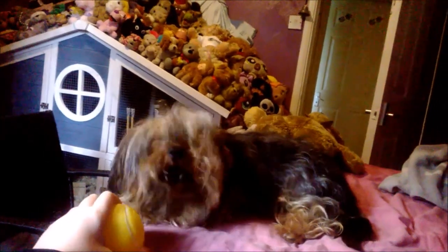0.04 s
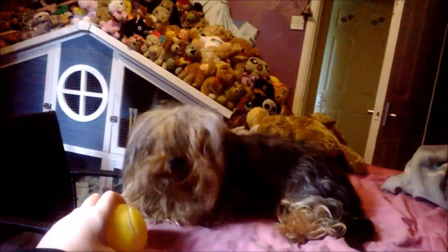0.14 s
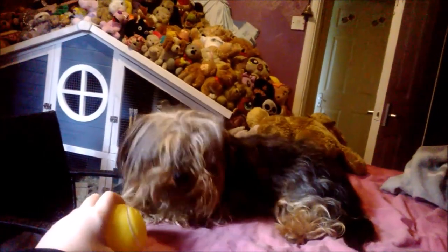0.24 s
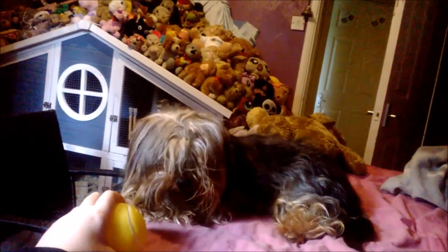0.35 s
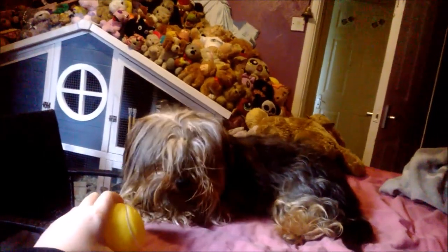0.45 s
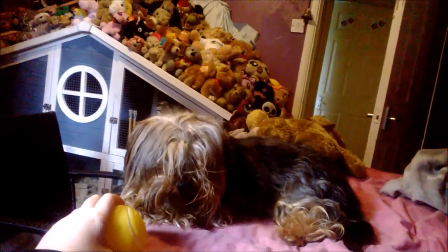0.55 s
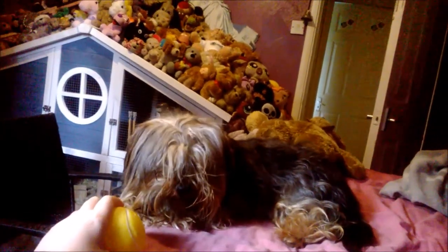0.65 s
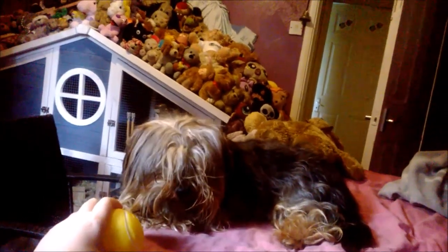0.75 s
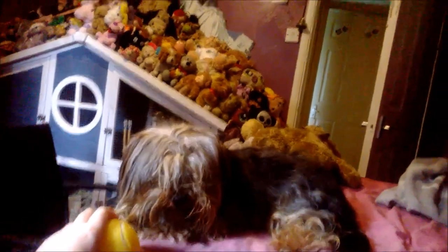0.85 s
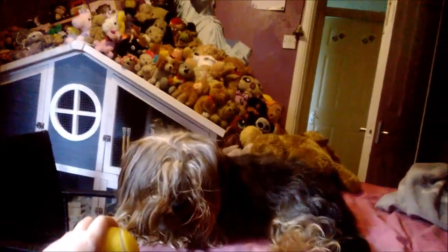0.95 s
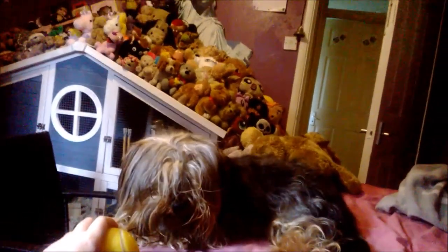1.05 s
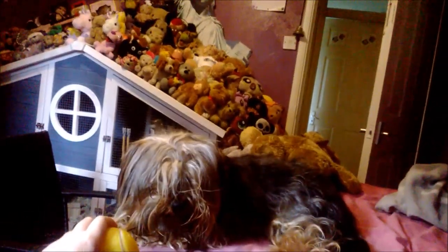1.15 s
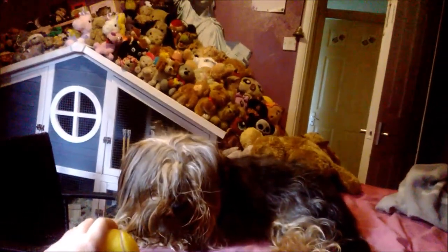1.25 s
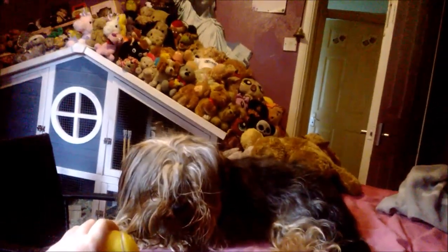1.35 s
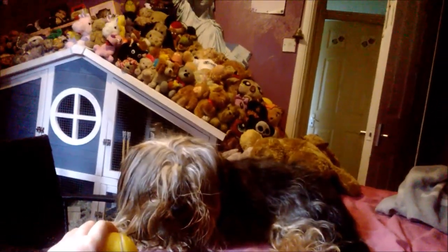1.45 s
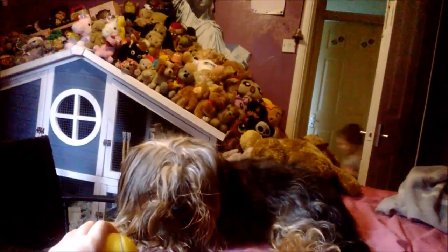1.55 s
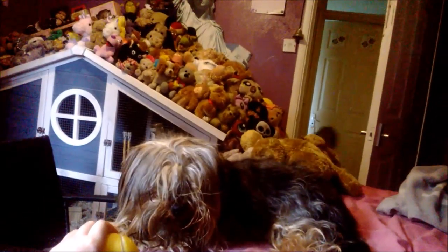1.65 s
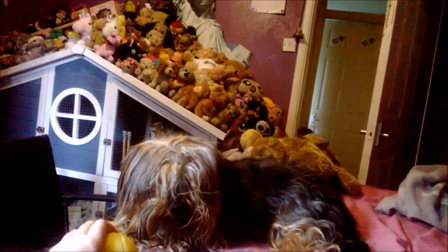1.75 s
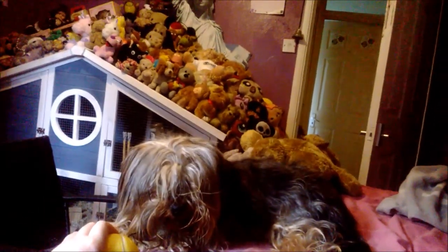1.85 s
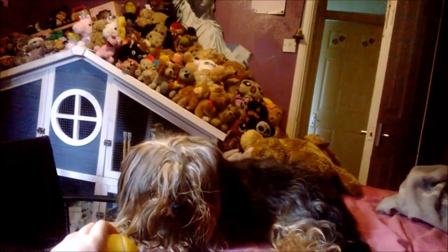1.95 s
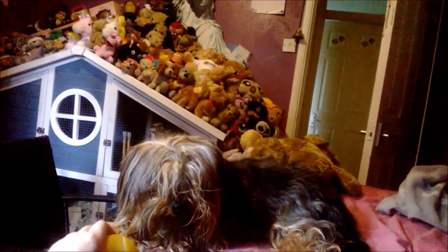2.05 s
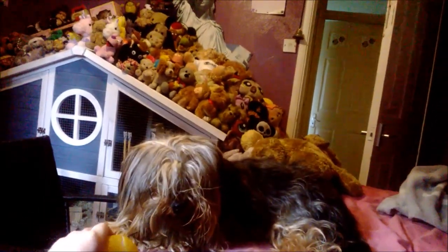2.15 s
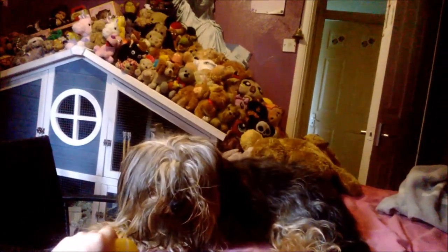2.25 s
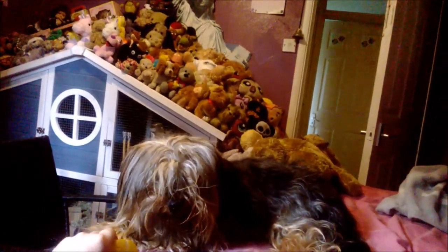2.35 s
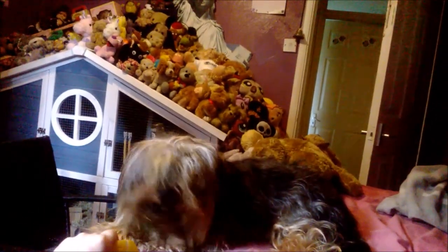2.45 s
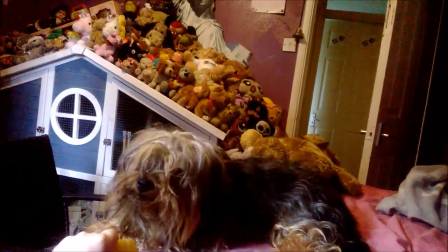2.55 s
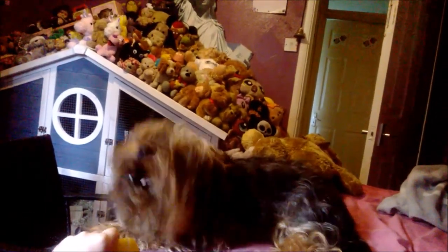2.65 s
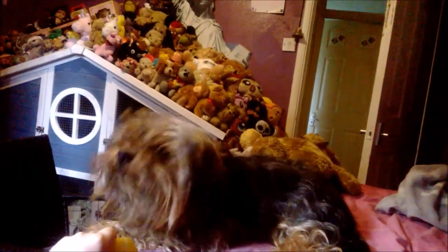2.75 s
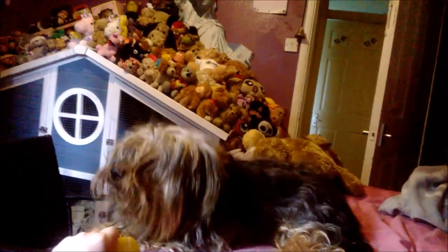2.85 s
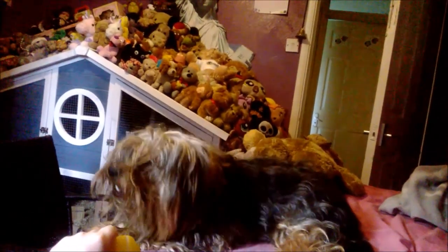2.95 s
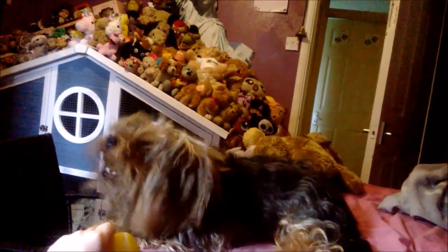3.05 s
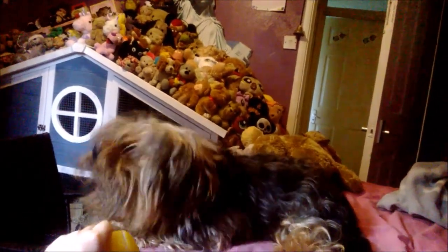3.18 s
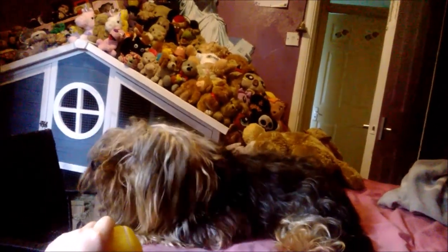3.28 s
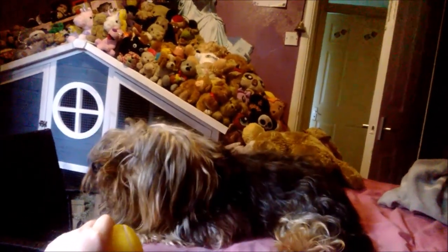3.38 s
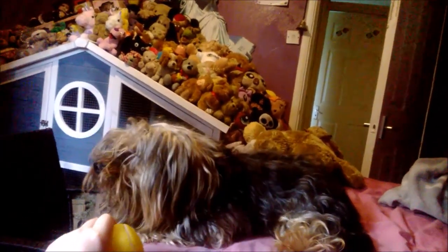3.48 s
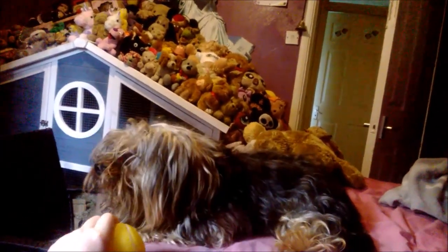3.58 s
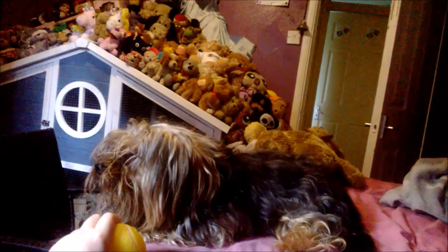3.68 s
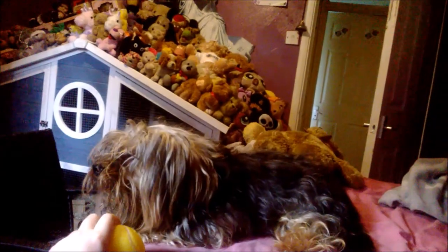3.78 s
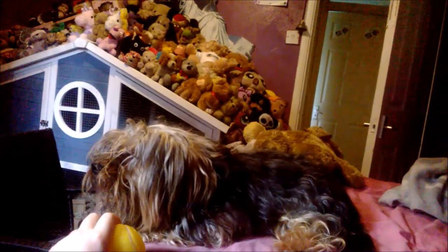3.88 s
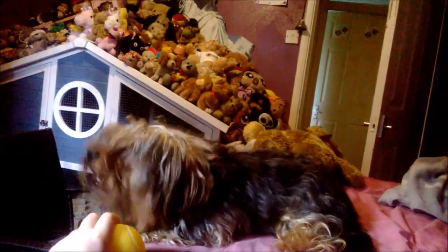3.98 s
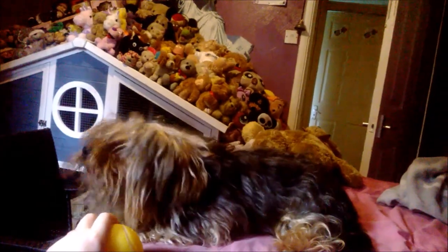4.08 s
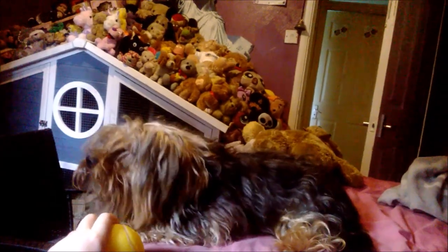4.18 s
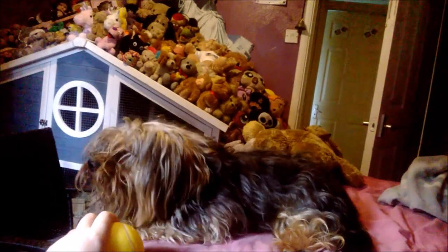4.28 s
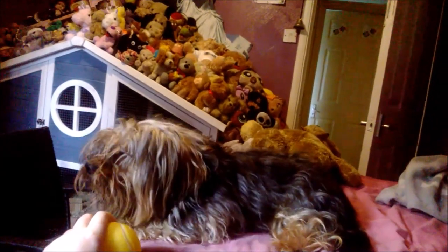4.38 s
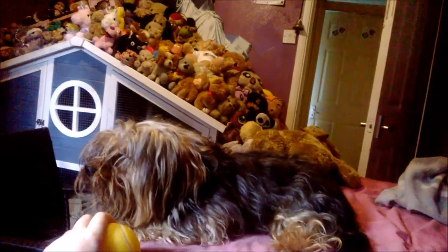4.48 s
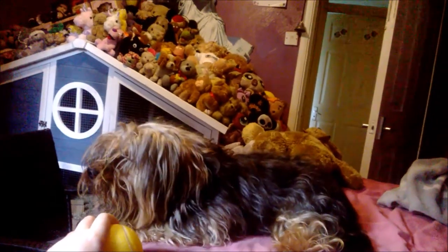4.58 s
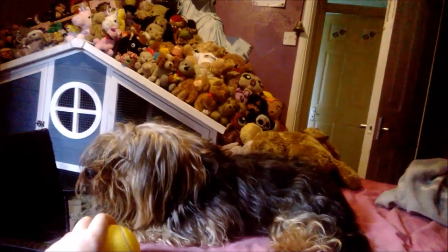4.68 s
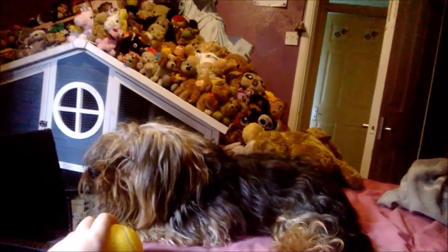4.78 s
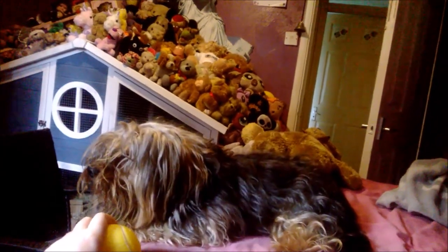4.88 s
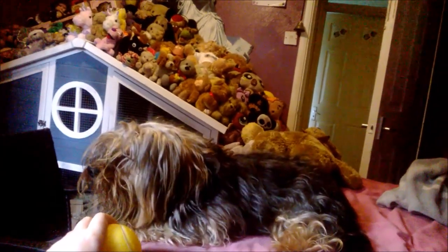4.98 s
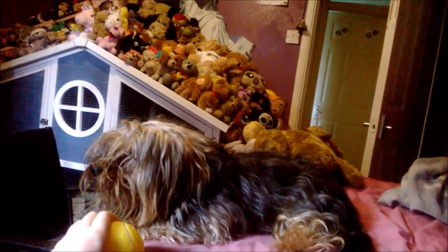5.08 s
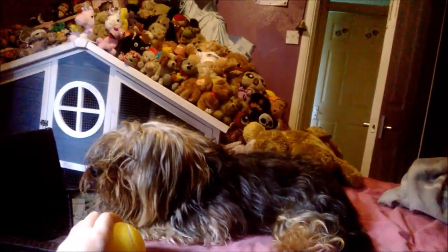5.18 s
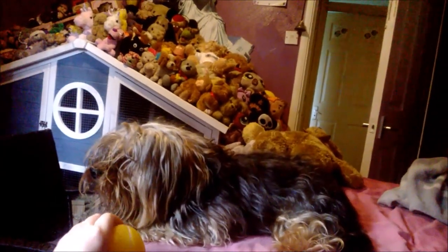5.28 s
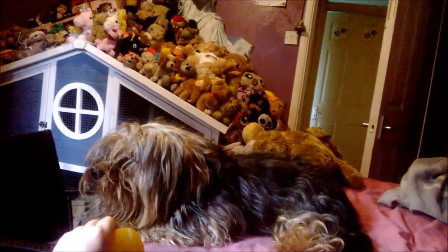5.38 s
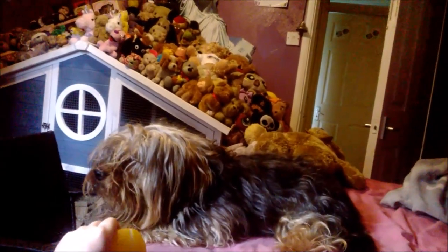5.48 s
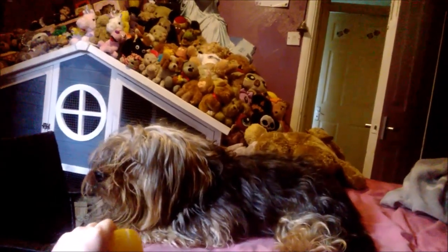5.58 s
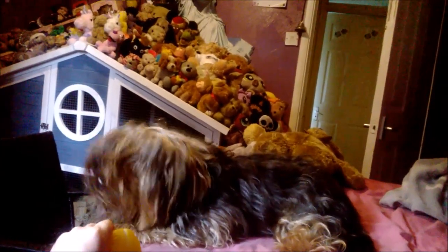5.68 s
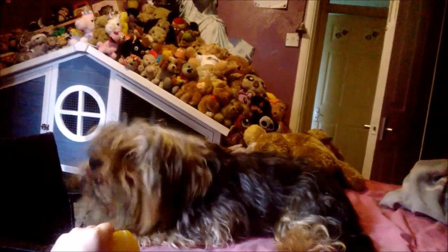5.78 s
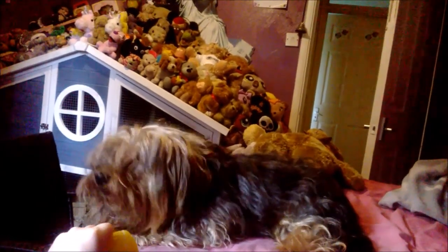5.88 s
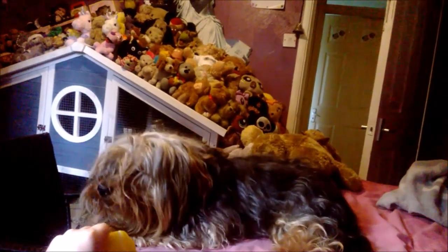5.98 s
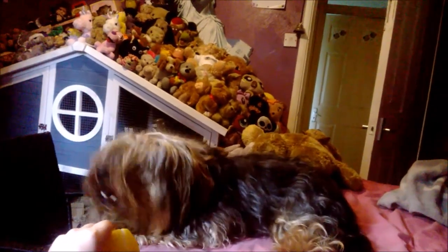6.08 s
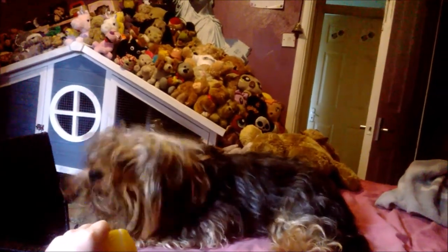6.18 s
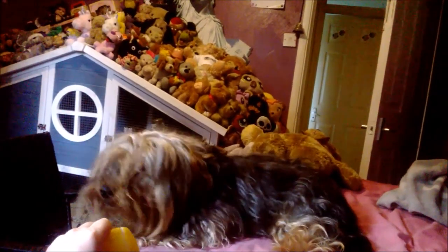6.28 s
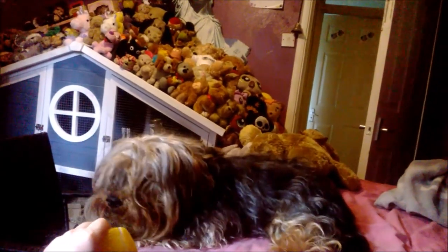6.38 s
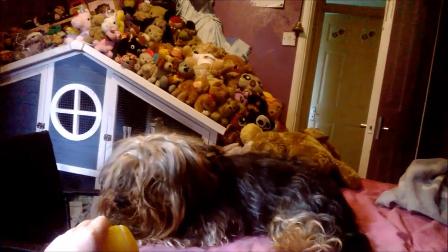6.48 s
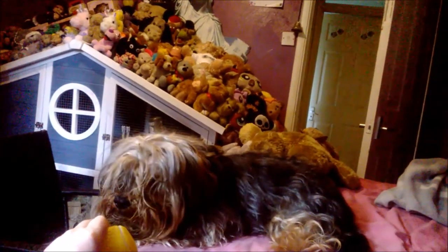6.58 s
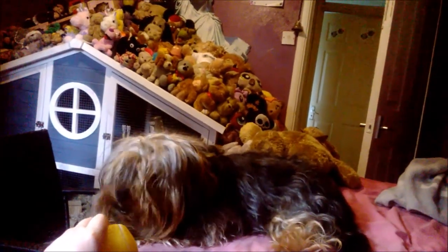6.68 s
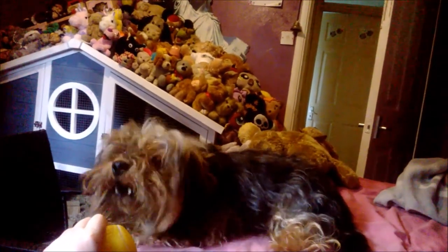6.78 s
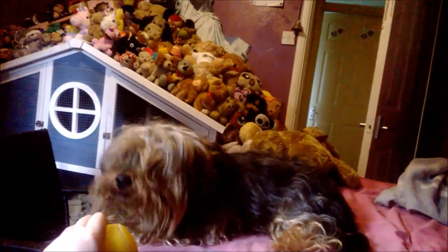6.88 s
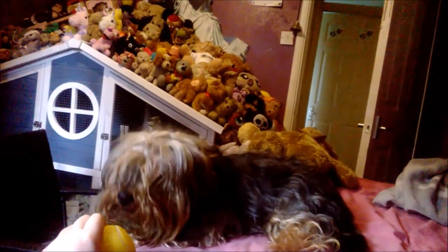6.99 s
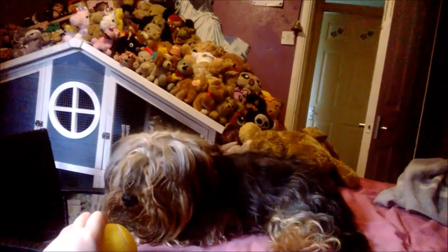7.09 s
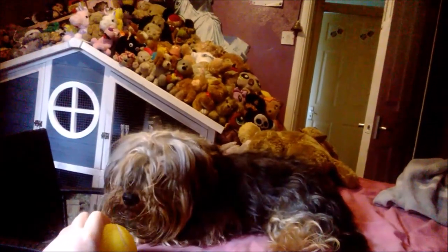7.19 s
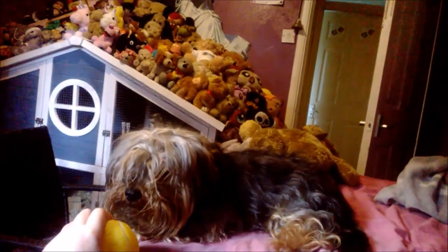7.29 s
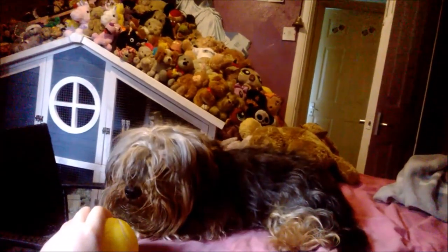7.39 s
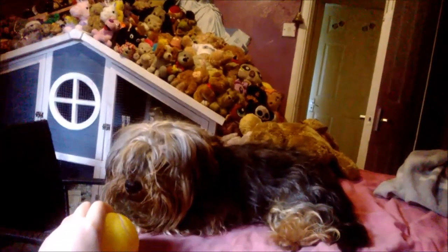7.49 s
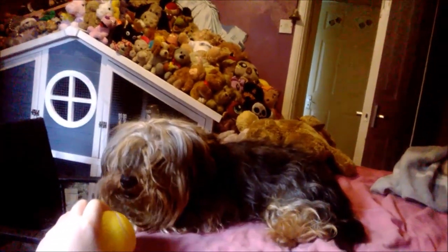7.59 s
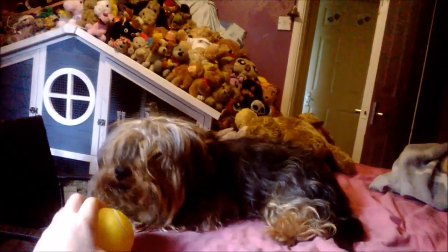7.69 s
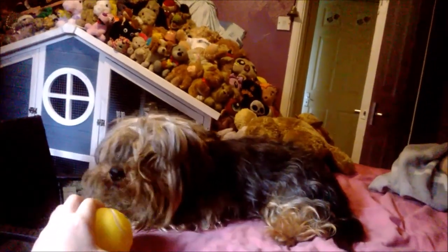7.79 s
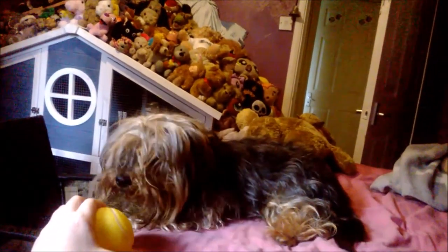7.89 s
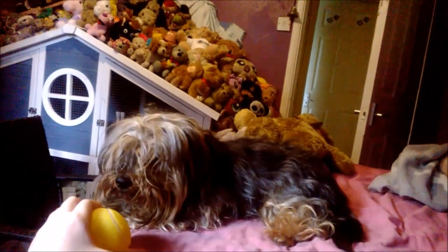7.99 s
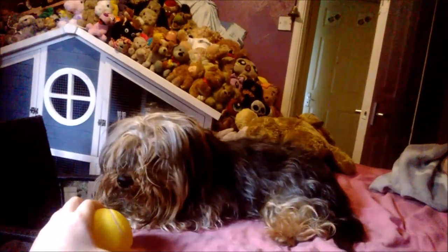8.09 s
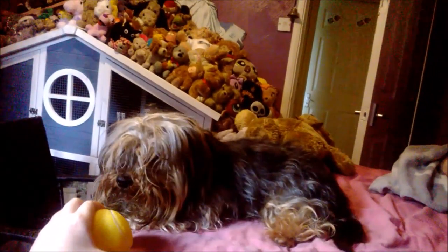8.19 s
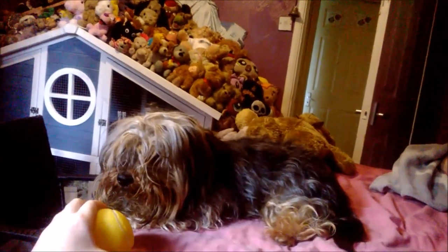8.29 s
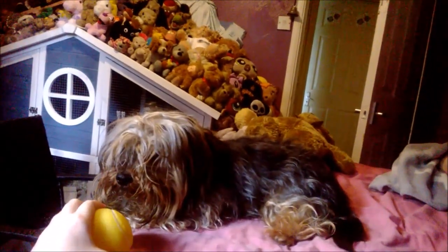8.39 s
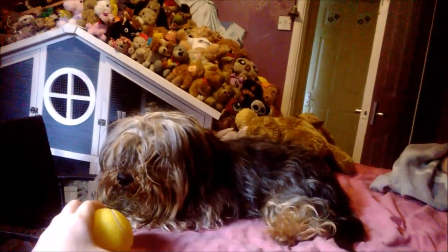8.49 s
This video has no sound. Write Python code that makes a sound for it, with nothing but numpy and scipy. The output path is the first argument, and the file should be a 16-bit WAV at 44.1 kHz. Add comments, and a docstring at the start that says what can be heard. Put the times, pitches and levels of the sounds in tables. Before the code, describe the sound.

In a small furnished bedroom, a squeaky ball whines softly and a small terrier yaps at once. The dog huffs, the ball squeals, and three shrill, raspy yaps follow. A louder, piercing squeal brings three more yaps and a final softer woof. The ball whines thinly as it refills after each squeeze. Bedding thumps faintly underneath, and everything is close to the microphone.

```python
"""A squeaky ball whines softly as it refills, and at once a small terrier on a bed yaps at it. The dog
huffs, yaps six more times and ends on a soft woof, while a hand close by squeezes the ball. Each yap
starts as a low rasp of the vocal folds, breaks into a shrill whistle and slides down. The ball's reed,
driven by the airflow, squeals when pressed and whines as air returns. Bedding thumps under them, in a
small furnished bedroom."""
import sys
import numpy as np
from scipy import signal
from scipy.fft import rfft, irfft, next_fast_len
from scipy.io import wavfile
from scipy.ndimage import uniform_filter1d, minimum_filter1d

SR = 44100
rng = np.random.default_rng(int(sys.argv[2]) if len(sys.argv) > 2 else 0)


def store_wav(level_fs):
    """Save 16-bit WAV to argv[1]."""
    pcm = np.round(np.clip(np.atleast_2d(level_fs), -1, 1) * 32767)
    wavfile.write(sys.argv[1], SR, pcm.T.astype(np.int16))


N = 376613
BAND_LIMIT_HZ = 15750


def amp(db):
    """Amplitude ratio: tenfold for every 20 dB."""
    return 10 ** (np.asarray(db) / 20)


def blend(a, b, u):
    """Linear interpolation from a to b as u goes from 0 to 1."""
    return a + (b - a) * u


def read(points, hz):
    """Interpolation on a log-frequency axis."""
    f, value = np.transpose(points)
    return np.interp(np.log(hz + 1), np.log(f + 1), value)


def curves(rows):
    """Piecewise-linear control: the start time, and each further column at every sample."""
    times, *columns = np.transpose(rows)
    t = np.arange(times[0], times[-1], 1 / SR)
    return times[0], [np.interp(t, times, column) for column in columns]


def add(mix, s, sound):
    """Superposition: a sound joins the mix at time s."""
    part = mix[max(round(s * SR), 0):][:len(sound)]
    part += sound[:len(part)]


def noise(spectrum, count):
    """Spectral shaping of white noise, scaled to rms 1."""
    size = next_fast_len(count)
    gain = amp(read(spectrum, np.fft.rfftfreq(size, 1 / SR)))
    x = irfft(rfft(rng.standard_normal(size)) * gain, size)[:count]
    return x / np.sqrt(np.mean(x ** 2) + 1e-20)


def wander(hz, count):
    """Low-pass noise: random motion of rms 1, mostly slower than hz."""
    return noise([(hz, 0), (2 * hz, -20), (4 * hz, -80)], count)


def steady(x, size):
    """Division by the running rms evens out the loudness."""
    return x / np.sqrt(abs(uniform_filter1d(x ** 2, size)) + 1e-9)


def swell(rise, decay):
    """Exponential damping after a smooth rise, one second in all."""
    t = np.arange(SR) / SR
    return np.sin(np.pi / 2 * np.minimum(t / rise, 1)) ** 2 * np.exp(-np.maximum(t - rise, 0) / decay)


def low_cut(x, hz):
    """Radiation efficiency: a small source gives off little bass."""
    return signal.sosfilt(signal.butter(2, hz, "highpass", fs=SR, output="sos"), x)


def partials(hz, body, tilt_db=0, waver_db=0, waver_hz=9, count=15):
    """A harmonic series of rms 1, coloured by a body and tilted per octave; each partial may waver."""
    k = np.arange(1, count + 1)[:, None]
    height = amp(read(body, k * hz) + tilt_db * np.log2(k)) * (k * hz < BAND_LIMIT_HZ + 1000)
    turns = k * np.cumsum(hz) / SR + rng.random((count, 1))
    waver_rates = waver_hz * rng.uniform(.25, 1, (2, count, 1))
    waver_turns = waver_rates * np.arange(len(hz)) / SR + rng.random((2, count, 1))
    height = height * amp(waver_db * np.sin(2 * np.pi * waver_turns).sum(0))
    return (height * np.sin(2 * np.pi * turns)).sum(0) / np.sqrt((height ** 2).sum(0) / 2)


# background spectrum (frequency [Hz], relative density [dB])
AMBIENT_SPECTRUM = [(12, -31.5), (20, 5.5), (61, 6), (160, -18), (217, -7), (445, -24), (914, -22),
                    (1050, -21), (1880, -27), (5690, -32.5), (15000, -37)]
# its drift (time [s], relative level [dB])
AMBIENT_DRIFT = [(0, 0), (1.5, 1), (4.7, 1), (6.6, 2.5), (7.3, -7), (8.5, -4.5)]
def ambience(level_db=-65.5):
    """Ambient noise: a faint low rumble and hiss that drops away near the end."""
    drift_db = np.interp(np.arange(N) / SR, *np.transpose(AMBIENT_DRIFT))
    return amp(level_db + drift_db) * noise(AMBIENT_SPECTRUM, N)


# decay of the bedroom (frequency [Hz], reverberation time [s])
ROOM_T60 = [(150, .42), (700, .32), (1700, .33), (4000, .3), (8000, .28), (15000, .18)]
# reflections from near surfaces and the far wall, for each source (delay [s], gain [dB])
DOG_ECHOES = [(.0012, -26), (.0077, -19.5), (0.0136, -22), (0.0242, -20.5), (0.033, -14.5)]
BALL_ECHOES = [(.00079, -17.5), (.00229, -24), (.004, -24), (.00703, -23), (.00794, -15), (0.0137, -16.5)]
def room(x, echoes, near_db, tail_db, near_decay_s=.006):
    """Reverberation: single echoes, scatter from furniture, and a tail whose treble dies first."""
    n = SR * 2 // 3
    taps = rng.choice([-1., 1.], n) * (rng.random(n) < .1) * (np.arange(n) > 250)
    hz, t, spectra = signal.stft(taps, SR, nperseg=256)
    absorption = amp(-60 * t / read(ROOM_T60, hz)[:, None])
    tail = signal.istft(spectra * absorption, SR, nperseg=256)[1][:n]
    near = taps * rng.choice([-1., 1.], n) * np.exp(-np.arange(n) / SR / near_decay_s)
    response = amp(tail_db) * tail / np.linalg.norm(tail) + amp(near_db) * near / np.linalg.norm(near)
    for delay, db in echoes:
        response[round(delay * SR)] += amp(db)
    return x + signal.fftconvolve(x, response)[:N]


# spectra of mattress and cover (frequency [Hz], relative density [dB])
MATTRESS = [(20, 0.5), (50, -4.5), (90, 2.5), (140, -12.5), (250, -31.5), (600, -64.5)]
COVER = [(60, -26.5), (150, 5.5), (400, -1), (700, -16), (1500, -32), (5000, -41), (12000, -63.5)]
# shifts of weight (time [s], thump level [dB], rustle level [dB], rise time [s])
THUMPS = [(.68, -54.5, -62.5, 0.029), (.92, -42, -57, 0.021), (1.0, -49, -70, 0.019),
          (1.179, -50.5, -55, .03), (1.471, -35.5, -46.5, 0.017), (1.72, -47, -52, 0.018),
          (2.31, -38.5, -50.5, 0.054), (2.68, -42, -43.5, 0.0175), (2.935, -38.5, -51, 0.016),
          (3.189, -43, -76.5, 0.051), (3.417, -35, -49, 0.0158), (4.53, -56.5, -54.5, 0.0503),
          (4.69, -46.5, -61, .04), (5.15, -44, -63.5, .05), (5.25, -50, -77, .03), (5.74, -39, -63, 0.016),
          (5.952, -41.5, -59.5, 0.038)]
def bedding(bounce_s=4.725, bounce_hz=51, bounce_db=-34):
    """Impact and friction: weight thumps the mattress and brushes the cover; the springs bounce once."""
    out = np.zeros(N)
    for s, thump_db, rustle_db, rise in THUMPS:
        add(out, s, amp(thump_db) * swell(rise, decay=.06) * steady(noise(MATTRESS, SR), size=1500))
        add(out, s, amp(rustle_db) * swell(rise, decay=.045) * noise(COVER, SR))
    springs = np.sqrt(2) * np.sin(2 * np.pi * bounce_hz * np.arange(SR) / SR)
    add(out, bounce_s, amp(bounce_db) * swell(rise=.029, decay=.032) * springs)
    return out


# spectrum of nasal airflow (frequency [Hz], relative density [dB])
NOSE = [(100, 8.5), (300, 10.5), (700, -0.5), (1300, -3), (2000, 0), (3300, -3.5), (5000, -18),
        (9000, -23.5), (13000, -41)]
# huffs (time [s], air level [dB], grunt level [dB])
HUFFS = [(1.195, -59, -59), (1.454, -40, -26.5), (1.721, -31.5, -39)]
def huff(s, air_db, grunt_db, grunt_hz=290, lead_s=.012, droop=.08):
    """Turbulence: air puffs through the nose after a few sagging cycles of closed-mouth grunt."""
    out, t = np.zeros(N), np.arange(1500) / SR
    turns = np.cumsum(grunt_hz * (1 + droop * (1 - 2 * t / t[-1]))) / SR
    grunt = np.hanning(len(t)) * np.sqrt(2) * np.sin(2 * np.pi * turns)
    add(out, s - lead_s, amp(grunt_db) * grunt)
    add(out, s, amp(air_db) * swell(rise=.0099, decay=.03524) * noise(NOSE, SR))
    return out


def reed(rows, pipe, gain_db, jitter, hiss_db, sag=0):
    """Self-sustained oscillation: a reed buzzes into its short pipe, hissing more as its pitch moves."""
    attack_s, release_s, sag_s, glide_hiss_db = .005, .019, .0088, 9
    s, (hz, db) = curves(rows)
    n = len(hz)
    t = np.arange(n) / SR
    hz = hz * (1 - sag * np.exp(-t[::-1] / sag_s))  # the pitch sags as the air runs out
    pitch = hz * (1 + jitter * wander(370, n) + .0016 * wander(34, n))
    octaves_per_s = uniform_filter1d(abs(np.gradient(np.log2(hz))) * SR, size=600)
    hiss_gain = amp(hiss_db + glide_hiss_db * np.minimum(octaves_per_s / 3, 1))
    hiss = hiss_gain * low_cut(noise(pipe, n), hz=1500)
    gate = np.minimum(np.minimum(t / attack_s, t[::-1] / release_s), 1)
    return s, amp(db + gain_db) * gate * (partials(pitch, pipe, waver_db=1.5) + hiss)


# spectrum of the rattling reed (frequency [Hz], relative density [dB])
RATTLE = [(300, -48.5), (1300, -18), (2400, 9.5), (4500, -1), (7000, -10), (10000, -7.5), (14000, -32.5)]
def reed_break(db, length_s):
    """Mode transition: between its two modes the reed rattles for an instant."""
    n = round(length_s * SR)
    return amp(db) * noise(RATTLE, n) * np.hanning(n)


# reed gestures, one curve each (time [s], pitch [Hz], relative level [dB])
SQUEEZES = [
    [(2.151, 1018, -33.5), (2.167, 1115, -21), (2.179, 1198, -20.5), (2.195, 1230, -19),
     (2.227, 1266, -15.5), (2.299, 1328, -14), (2.367, 1309, -15), (2.457, 1228, -17.5), (2.513, 1172, -22),
     (2.535, 1099, -20), (2.571, 989, -31), (2.581, 993, -34.5), (2.6, 930, -42.5)],
    [(5.362, 1078, -28), (5.38, 1239, -19), (5.398, 1332, -12), (5.444, 1518, -10), (5.468, 1554, -6.5)],
    [(5.777, 1448, -28.5), (5.81, 1375, -18), (5.84, 1330, -28.5), (5.9, 1180, -28.5), (5.95, 967, -36.5)],
]
REFILLS = [
    [(0.0, 1392, -24), (0.048, 1356, -28), (0.11, 1355, -29.5), (0.222, 1404, -29), (0.246, 1310, -36),
     (0.26, 1303, -44.5)],
    [(3.003, 1315, -58.5), (3.009, 1293, -39), (3.027, 1328, -34.5), (3.133, 1350, -28), (3.153, 1343, -30),
     (3.425, 1349, -31), (3.535, 1322, -36), (3.759, 1371, -27), (3.823, 1389, -28), (3.87, 1255, -41.5)],
    [(6.116, 1327, -40), (6.15, 1411, -25), (6.186, 1444, -29.5), (6.428, 1392, -28), (6.488, 1374, -32),
     (6.508, 1368, -30), (6.786, 1355, -34), (6.89, 1230, -55.5)],
    [(7.088, 1279, -45.5), (7.106, 1335, -37.5), (7.168, 1344, -33), (7.228, 1399, -31),
     (7.264, 1305, -40.5), (7.27, 1318, -38.5)],
]
OVERBLOWN = [(5.457, 2436, -8.5), (5.468, 3857, -21), (5.48, 4067, -16), (5.515, 4127, -15.5),
             (5.595, 4134, -15.5), (5.635, 3940, -16.5), (5.69, 3912, -17), (5.732, 3574, -18),
             (5.775, 3463, -17.5), (5.783, 3000, -8.5)]
# spectral envelope of the reed in each state (frequency [Hz], relative level [dB])
SQUEEZE_PIPE = [(1000, -2.5), (1450, -5), (2600, -6), (3900, -6), (5200, -4), (6600, 2), (7900, -6.5),
                (9300, -9), (10500, -12), (12000, -25), (15500, -44)]
REFILL_PIPE = [(1350, -4.5), (2700, -7.5), (4100, -10), (5450, -15.5), (6800, 0.5), (8200, -5), (9600, -5),
               (10900, -21), (12300, -29), (15000, -31.5)]
OVERBLOWN_PIPE = [(2400, -12), (4000, -1.5), (7200, -1), (8300, -3), (11000, -15.5), (12400, -36),
                  (15500, -47.5)]
def squeaky_ball():
    """Pressure drives air out through the reed and back; a hard squeeze overblows it to its upper mode."""
    out = np.zeros(N)
    for rows in SQUEEZES:
        add(out, *reed(rows, SQUEEZE_PIPE, gain_db=-1.5, jitter=.0025, hiss_db=-35))
    for rows in REFILLS:
        add(out, *reed(rows, REFILL_PIPE, gain_db=1.5, jitter=.0003, hiss_db=-43.5, sag=.09))
    add(out, *reed(OVERBLOWN, OVERBLOWN_PIPE, gain_db=-1, jitter=.00022, hiss_db=-45))
    add(out, 5.453, reed_break(db=-19, length_s=.024))
    add(out, 5.775, reed_break(db=-11.5, length_s=.0094))
    return out


# muzzle resonances (frequency [Hz], bandwidth [Hz], relative gain [dB])
MUZZLE_MODES = [(380, 130, -8), (723, 160, -10), (946, 120, -3), (1748, 140, 1.5), (2190, 130, -3.5),
                (2574, 160, -4), (3460, 120, -3), (3963, 280, 0.5)]
def muzzle(x, gain_db=-2, direct_db=-1.5):
    """Resonance: narrow modes ring as the pitch sweeps past; part of the voice passes straight out."""
    rings = sum(amp(db) * signal.lfilter(*signal.iirpeak(hz, hz / width, fs=SR), x)
                for hz, width, db in MUZZLE_MODES)
    return amp(gain_db) * (amp(direct_db) * x + rings)


# the throat's filtering of the overtones (frequency [Hz], gain [dB])
THROAT = [(200, -8), (500, -3), (900, 0), (1250, -5), (1700, 0), (2550, -1), (3050, -17), (3450, -9),
          (3800, -10), (4300, 0), (4750, -10), (5400, -28), (7000, -36), (10000, -20), (13000, -42)]
# breath noise, jaw nearly shut, half open and wide open (frequency [Hz], relative density [dB])
RASP_SHUT = [(100, -24), (250, -12.5), (400, -5.5), (520, -18.5), (760, 11), (1150, -7), (1650, -5),
             (2050, -16), (2500, -14), (3200, -30.5), (4150, -23), (5500, -46.5), (10000, -45.5),
             (13000, -63)]
RASP_HALF = [(100, -50.5), (300, -27), (520, -27.5), (680, -7), (930, 3), (1250, 2.5), (1700, 1),
             (2150, -12.5), (2750, -1.5), (3500, -15.5), (4200, -18), (5800, -46.5), (10000, -27),
             (13000, -60)]
RASP_WIDE = [(100, -43.5), (520, -36), (690, -24), (1050, -22), (1200, -13), (1700, -2.5), (2500, 6),
             (3300, -19), (4250, -8.5), (5700, -44.5), (8000, -39), (10000, -19.5), (13000, -55)]
def voice(hz, tone_db, rasp_db, gape=0, tilt_db=-14):
    """Source and filter: the folds sing and rasp, and the jaw opens as the pitch climbs."""
    shut_hz, half_hz, wide_hz = 600, 950, 1900  # pitch at each jaw position
    n = len(hz)
    tone_db, rasp_db = uniform_filter1d([tone_db, rasp_db], size=200)
    rasp_share = 1 / (1 + amp(tone_db - rasp_db) ** 2)
    pitch = hz * (1 + .028 * (rasp_share + .05) * wander(220, n))
    tone = partials(pitch, THROAT, tilt_db=tilt_db, count=8)
    half = np.clip((hz - shut_hz) / (half_hz - shut_hz), 0, 1)
    wide = np.clip(np.maximum((hz - half_hz) / (wide_hz - half_hz), gape), 0, 1)
    air = (np.sqrt(1 - half) * noise(RASP_SHUT, n)
           + np.sqrt(half - wide * half) * noise(RASP_HALF, n)
           + np.sqrt(wide) * noise(RASP_WIDE, n))
    # loose tissue chops the air into puffs: slow and deep in the growl, faster and shallower in the yap
    flutter_hz = np.interp(hz, [200, shut_hz], [120, 240]) * (1 + (.055 + .25 * half) * wander(90, n))
    flutter = .45 * (1.6 - half) * np.cos(2 * np.pi * np.cumsum(flutter_hz) / SR)
    rasp = steady(air * (1 + flutter), size=360)
    return low_cut(amp(tone_db) * tone + amp(rasp_db) * rasp, hz=151)


# faint mutters after some yaps (time [s], duration [s], pitch [Hz], level [dB])
MUTTERS = [(.285, 0.038, 365, -50), (4.231, 0.16, 263.4, -55), (6.968, 0.05, 333, -55.5)]
def mutter(s, length_s, hz, db, rasp_db=-4):
    """Closed-mouth phonation: a short, husky hum."""
    flat = np.ones(round(length_s * SR))
    hum = voice(hz * flat, db * flat, (db + rasp_db) * flat)
    return s, hum * signal.windows.tukey(len(flat), .5)


# the last call (time [s], pitch [Hz], tone level [dB], rasp level [dB])
WOOF = [(7.665, 161.7, -53.5, -66), (7.728, 305.6, -29.5, -30.5), (7.742, 625, -29, -19),
        (7.756, 788.6, -15, -25), (7.785, 1031, -17, -21), (7.805, 941, -27, -32.5), (7.825, 729, -14, -30),
        (7.842, 556, -37, -56.5), (7.865, 253.7, -47, -60), (7.9, 233, -59, -79)]
def woof():
    """Phonation in one register: a soft arch of pitch that never breaks into the whistle."""
    s, controls = curves(WOOF)
    sound = voice(*controls)
    return s, sound * signal.windows.tukey(len(sound), .06)


# resonances that swell a yap's falling note (pitch [Hz], gain [dB])
FALL_GAIN = [(500, -28.5), (600, -9.5), (740, 3), (850, -7), (1000, -10), (1350, -1), (1650, 9)]
# yaps (bark onset [s], durations of growl, bark, whistle, held note and fall [s],
# pitches of bark, whistle and held note [Hz], levels of growl, bark tone, bark rasp, whistle,
# held note and fall [dB], jaw opening [0-1], overtone tilt [dB/octave], hoarseness [dB])
YAPS = [(.106, .026, 0.045, 0.04, 0.024, 0.044, 860, 2600, 1806, -28, -13.5, -10.5, -9.5, -9.5, -20, 0.2, -5, -2.5),
        (2.736, 0.029, 0.057, 0.042, 0.015, 0.044, 930, 2600, 1710, -35.5, -14.5, -8.5, -12.5, -8, -21, 0.34, -9.5, 2.5),
        (3.133, 0.025, 0.046, .033, 0.037, 0.051, 924, 2081, 1672, -30, -12, -11, -12.5, -10.5, -27, .5, -10.5, -10),
        (4.043, .046, 0.048, 0.049, 0.026, 0.062, 850, 2540, 1731, -30, -18.5, -11, -10.5, -14.5, -23, .1, -12, -1),
        (5.78, .028, .064, .037, .011, 0.04, 850, 2594, 1677, -31.5, -18.5, -10.5, -11.5, -7, -25, 0.5, -13.5, 0.5),
        (6.17, 0.027, .046, 0.033, 0.029, 0.042, 955.1, 2050, 1718, -33.5, -10.5, -11.5, -10.5, -8.5, -27, 0, -11, -10),
        (6.793, 0.0232, 0.04524, 0.045, 0.025, 0.0554, 910, 2540, 1684, -30.5, -12.5, -11.5, -11.5, -10, -25, 0.4, -7.5, -4)]
def yap(s, growl_s, bark_s, whistle_s, held_s, fall_s, bark_hz, whistle_hz, held_hz,
        growl_db, bark_db, rasp_db, whistle_db, held_db, fall_db, gape, tilt_db, hoarse_db):
    """Register break: a growl opens into a harsh bark, jumps to a whistle, steps down and falls away."""
    growl_hz, growl_swell_db, growl_rasp_db = 193.1, 23, -2
    open_s, open_hz = .016, 289.7  # the jaw snaps open in this time, from this pitch
    bark_climb, bark_fade_db, rasp_swell_db = 1.07, 4, 5.5
    whistle_end_hz, held_sag, fall_target_hz, fall_rate = 2081, .95, 502, 2.9
    # rasp against tone at the whistle's start and at the ends of whistle, held note and fall
    break_db, step_db, drop_db, end_db = np.add((-4.5, -8, -17.5, -8.5), hoarse_db)
    t = np.arange(-.1, .3, 1 / SR)
    edges = np.cumsum([-growl_s - open_s, growl_s, open_s, bark_s, whistle_s, held_s, fall_s])
    stage = np.searchsorted(edges[1:-1], t)
    u = np.interp(t, edges, np.arange(len(edges))) - stage  # 0-1 within each stage

    # each stage is (pitch [Hz], tone level [dB], rasp level [dB])
    growling_db = growl_db - growl_swell_db * (1 - u)
    growl = blend(growl_hz, open_hz, u), growling_db, growling_db + growl_rasp_db
    opening_rasp_db = blend(growl_db + growl_rasp_db, rasp_db - rasp_swell_db / 2, u)
    opening = blend(open_hz, bark_hz, u), blend(growl_db, bark_db, u), opening_rasp_db
    bark = bark_hz * bark_climb ** u, bark_db - bark_fade_db * u, rasp_db + rasp_swell_db * (u - .5)
    slip = .5 + .5 * np.tanh((u - .48) / .2)  # the whistle clings, then slips to the next resonance
    whistle = (blend(whistle_hz, whistle_end_hz, slip), np.full_like(u, whistle_db),
               whistle_db + blend(break_db, step_db, u))
    held = held_hz * held_sag ** u, np.full_like(u, held_db), held_db + blend(step_db, drop_db, u)
    fall_hz = blend(fall_target_hz, held_hz * held_sag, np.exp(-fall_rate * u))
    falling_db = fall_db + read(FALL_GAIN, fall_hz)
    fall = fall_hz, falling_db, np.minimum(falling_db, fall_db) + end_db

    hz, tone, rasp = np.choose(stage, np.array([growl, opening, bark, whistle, held, fall]))
    wobble = 1 + .014 * wander(69.3, len(t))  # the strained voice shakes
    pitch = uniform_filter1d(hz * wobble, size=130)
    gate = np.clip(np.minimum((t - edges[0]) / .0054, (edges[-1] - t) / .0066), 0, 1)
    bark_gape = gape * u * (stage == 2)
    return s + t[0], gate * voice(pitch, tone, rasp, gape=bark_gape, tilt_db=tilt_db)


def scene():
    """Superposition: dog and ball sound in the bedroom, over the bedding and a faint background."""
    dog = np.zeros(N)
    for row in YAPS:
        add(dog, *yap(*row))
    for row in MUTTERS:
        add(dog, *mutter(*row))
    add(dog, *woof())
    ball = squeaky_ball()
    nose = sum(huff(*row) for row in HUFFS)
    mix = room(muzzle(dog), DOG_ECHOES, near_db=-8, tail_db=-21.5)
    mix += room(ball, BALL_ECHOES, near_db=-6, tail_db=-18.5)
    mix += room(nose, DOG_ECHOES, near_db=-13, tail_db=-16)
    return (mix + bedding() + ambience())[None]


def record(dry, ceiling=.86):
    """Peak limiting: a quick, smooth gain dip holds the loudest peaks; a low-pass limits the band."""
    gain = np.minimum(1, ceiling / (abs(dry) + 1e-9))
    gain = minimum_filter1d(gain, size=161)
    gain = uniform_filter1d(uniform_filter1d(gain, size=81), size=81)
    low_pass = signal.firwin(511, BAND_LIMIT_HZ, window=("kaiser", 9), fs=SR)
    return signal.oaconvolve(dry * gain, low_pass[None], "same")


dry = scene()
out = record(dry)
store_wav(out)
```